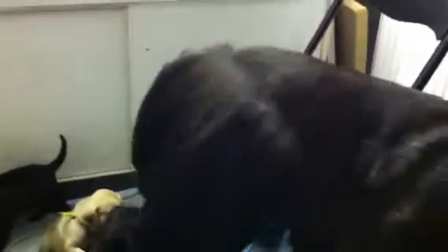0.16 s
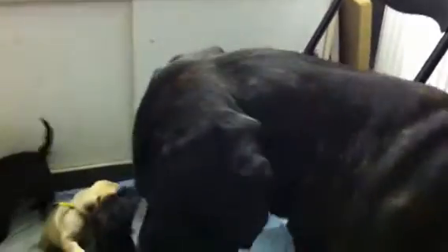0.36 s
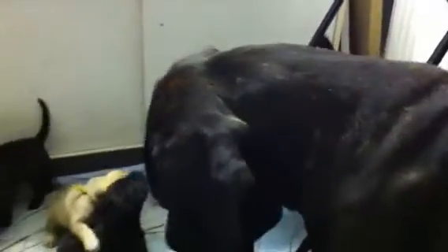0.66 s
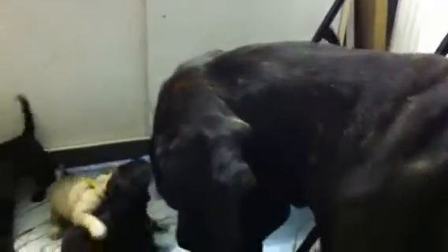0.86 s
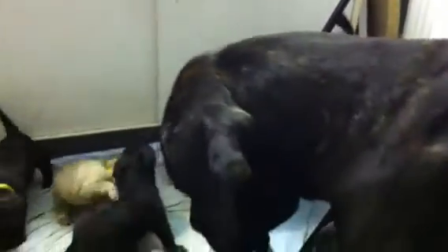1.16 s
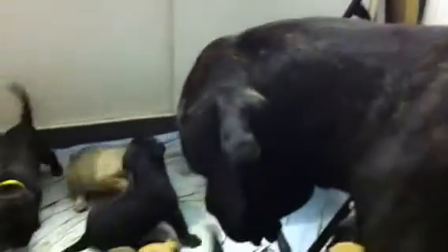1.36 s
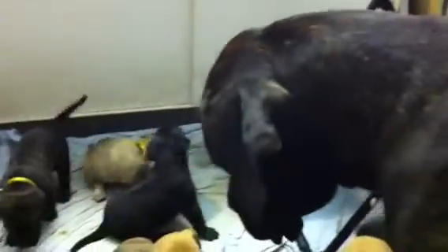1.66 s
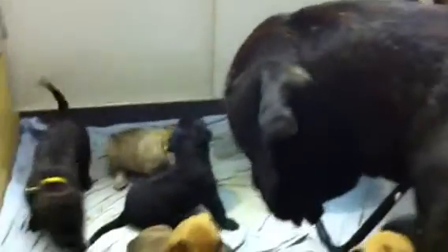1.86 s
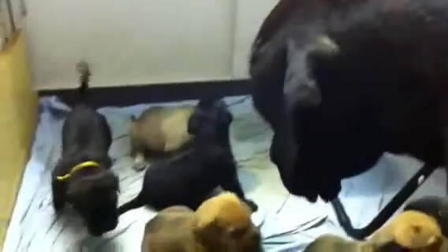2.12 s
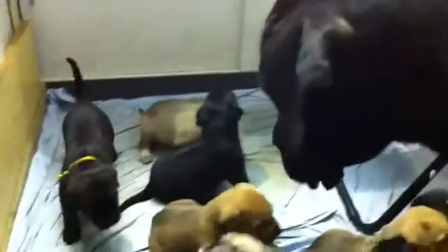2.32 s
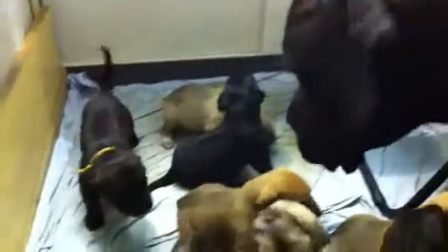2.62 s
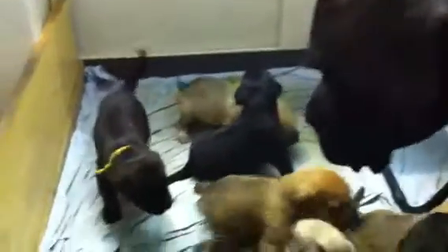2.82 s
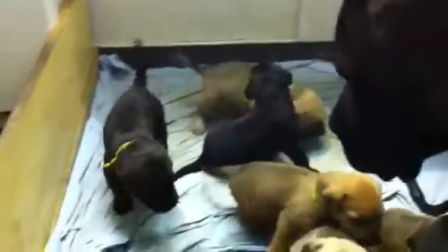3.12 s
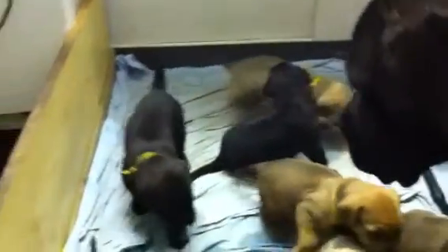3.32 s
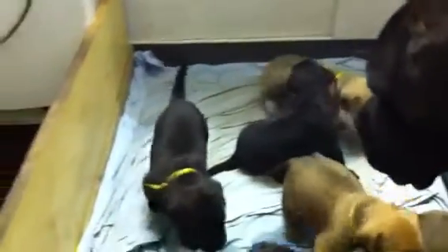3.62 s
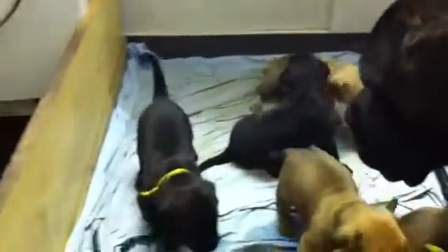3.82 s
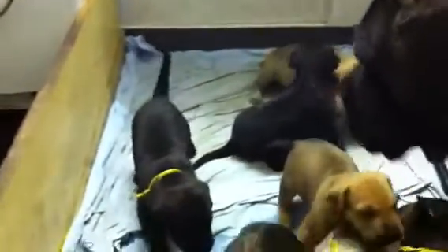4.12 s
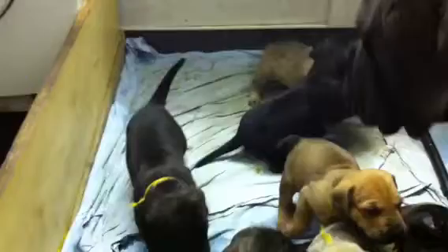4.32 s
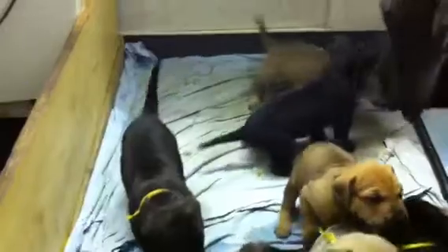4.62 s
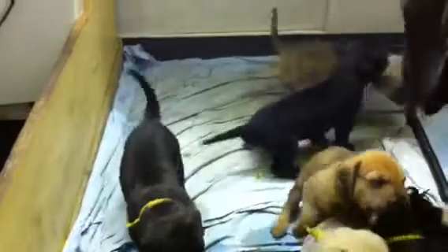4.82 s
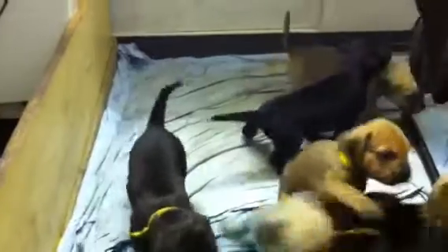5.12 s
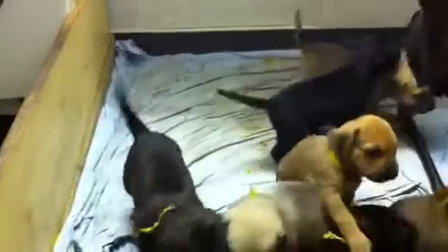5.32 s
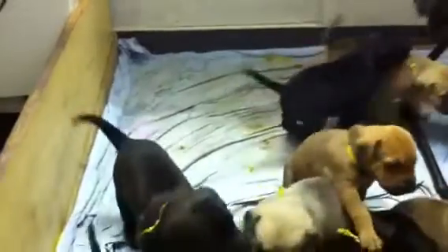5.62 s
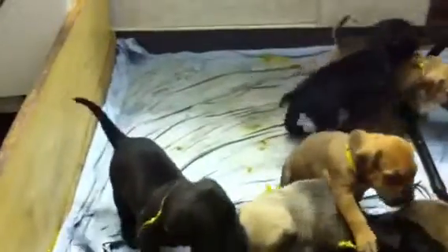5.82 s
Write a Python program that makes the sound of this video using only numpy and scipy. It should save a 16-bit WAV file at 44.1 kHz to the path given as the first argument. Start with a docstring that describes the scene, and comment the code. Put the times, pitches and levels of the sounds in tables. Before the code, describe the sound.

Five loud, breaking puppy yelps come between softer yips and grunts, with faint rustling of bedding over a low room rumble.

```python
"""Over a low room rumble a puppy whimpers, close to the microphone, in a whelping box in a small,
hard-walled room. After grunts and two yips come five loud yelps that arch up, break to a low
register and end in a rasp; softer whines and yips follow while paws shuffle on the bedding.
Each cry is vocal fold pulses and puffs of breath ringing the chest, throat and mouth.
Floor, box and walls send back quick echoes and a short ring."""
import sys
import numpy as np
from scipy import signal
from scipy.fft import rfft, irfft, next_fast_len
from scipy.io import wavfile
from scipy.ndimage import uniform_filter1d

SR = 44100
rng = np.random.default_rng(int(sys.argv[2]) if len(sys.argv) > 2 else 0)


def log_audio(samples):
    """Write samples as a 16-bit WAV file to the path given in sys.argv[1]."""
    # one column per channel
    frames = np.atleast_2d(samples).T
    # limit to full scale, then quantise
    limited = np.clip(frames, -1, 1)
    pcm = np.round(limited * 32767).astype(np.int16)
    wavfile.write(sys.argv[1], SR, pcm)


N = 263409
EDGE_HZ = 15750  # top of the overtones and of the microphone's band
CATCH_S = .016  # a cry starts hoarse, until the folds catch
# the chest's ring under a low or raspy voice: (frequency [Hz], gain [dB])
CHEST_RING = [(70, -48.5), (120, -28), (175, -11.5), (235, 2), (320, 0), (410, -12.5), (620, -34.5)]


def gain_of(db):
    """Decibels to amplitude."""
    return 10 ** (np.asarray(db) / 20)


def evened(x):
    """Scales to an rms of one."""
    return x / np.sqrt(np.mean(x ** 2) + 1e-20)


def steadied(x, size=500):
    """Scales to a running rms of one."""
    power = uniform_filter1d(uniform_filter1d(x ** 2, size), size)
    return x / np.sqrt(abs(power) + 1e-20)


def blend(a, b, share):
    """Goes from a to b as share goes from 0 to 1."""
    return a + (b - a) * share


def read(points, hz):
    """Reads a table on a logarithmic frequency axis."""
    f, value = np.transpose(points)
    return np.interp(np.log(hz + 1), np.log(f + 1), value)


def colour(x, points):
    """Filters by a table of (frequency [Hz], gain [dB])."""
    n = next_fast_len(len(x) + 2048)
    gain = gain_of(read(points, np.fft.rfftfreq(n, 1 / SR)))
    return irfft(rfft(x, n) * gain, n)[:len(x)]


def wander(n, rate_hz):
    """Smooth random drift of rms about one, rolled off above rate_hz."""
    size = next_fast_len(max(n, SR))
    hz = np.fft.rfftfreq(size, 1 / SR)
    spectrum = rfft(rng.standard_normal(size)) / (1 + (hz / rate_hz) ** 4)
    return evened(irfft(spectrum, size))[:n]


def resonate(x, hz, *widths_hz):
    """One resonance of gain one per width, in series, centred on a steady or gliding hz."""
    turn = np.exp(2j * np.pi * np.cumsum(np.broadcast_to(hz, len(x))) / SR)
    for width in widths_hz:
        pole = np.exp(-np.pi * width / SR)
        x = 2 * (turn * signal.lfilter([1 - pole], [1, -pole], x / turn + 1e-18)).real
    return x


def add(mix, s, sound):
    """Mixes a sound in at time s."""
    part = mix[round(s * SR):][:len(sound)]
    part += sound[:len(part)]


def room_tone(level_db=-64):
    """A low room rumble that wavers slightly, under thin steady hiss."""
    # the room's steady noise: (frequency [Hz], relative density [dB])
    spectrum = [(30, -37), (65, -28), (100, -18.5), (130, -8), (170, -2.5), (300, -3.5), (470, -5),
                (800, -10.5), (1300, -15), (2500, -20.5), (5000, -22.5), (9000, -24), (12000, -22),
                (15600, -25.5)]
    hiss = evened(colour(rng.standard_normal(N), spectrum))
    rumble = colour(hiss, [(600, 3.5), (1500, -17.5)])
    return gain_of(level_db) * (hiss + 0.14 * wander(N, rate_hz=3.2) * rumble)


def folds(hz, rough, jitter, rough_jitter, shimmer, alternation, spread_s):
    """Vocal fold pulses that grow uneven and give way to puffs of air as the voice roughens."""
    n = len(hz)
    unsteady_hz = hz * (1 + (jitter + rough_jitter * rough) * wander(n, rate_hz=125))
    turns = np.cumsum(unsteady_hz) / SR
    k = np.arange(1, int(EDGE_HZ / hz.min()) + 1)[:, None]
    # soft folds close gradually, so the overtones of each pulse arrive spread in time
    lag_s = spread_s * k * hz / EDGE_HZ
    overtones = np.cos(2 * np.pi * k * (turns - lag_s * hz)) * (k * hz < EDGE_HZ)
    pulses = evened(overtones.sum(0))
    # strong and weak pulses alternate in a strained voice
    pulses *= 1 + rough * (shimmer * wander(n, rate_hz=81) + alternation * np.cos(np.pi * turns))
    puffs = evened((0.55 + np.exp(-(turns % 1) / 0.2)) * rng.standard_normal(n))
    return blend(pulses, puffs, rough), puffs


def cry(t, hz, rough, throat_hz, mouth_db, throat_db, upper_db, low, jaw,
        mouth_shift, piercing_hz, piercing_db, top_db, air):
    """The folds drive the throat, chest, mouth and upper resonances; low is the low register's share."""
    # the mouth's resonance, and the upper ones with jaw wide or nearly shut: (frequency [Hz], gain [dB])
    mouth_ring = [(710, -46), (1030, -16.5), (1210, -7), (1470, 2), (1760, 2.5), (2010, -2.5), (2310, -9.5),
                  (2620, -27.5), (3150, -64.5)]
    upper_wide = [(2010, -46), (2560, -5.5), (2960, -3), (3340, -5), (3810, -3.5), (4460, 0.5),
                  (5010, -3.5), (5710, -5.5), (6310, -16), (8010, -19.5), (9610, -29), (12100, -29),
                  (14100, -45.5), (15400, -58.5)]
    upper_shut = [(2010, -11), (2660, -5), (3360, -10.5), (4110, -13), (4710, -10), (5610, -8),
                  (6710, -18.5), (8510, -9.5), (11100, -22), (15400, -42.5)]
    low_mouth_shift, gap_hz, brighten_s = 1.045, 2020, 0.044
    rough = np.clip(rough, 0, 1)
    drive, puffs = folds(hz, rough, jitter=.009, rough_jitter=.06, shimmer=0.74,
                         alternation=0.16, spread_s=0.0019)
    throat = resonate(drive, throat_hz, 870, 300)
    throat = colour(throat, [(70, -40), (140, -9), (240, 7.0), (1000, 5.0), (1400, -7)])
    # the lower and rougher the voice, the more chest
    throat += (0.72 + 0.65 * rough) * (340 / hz) ** 3 * colour(drive, CHEST_RING)
    mouth_high = colour(drive, np.array(mouth_ring) * [mouth_shift, 1])
    mouth_low = colour(drive, np.array(mouth_ring) * [mouth_shift * low_mouth_shift, 1])
    mouth = blend(mouth_high, mouth_low, low)
    # the cry starts through a narrow gap behind the tongue, which rings higher
    mouth += 4 * np.exp(-t / 0.0051) * resonate(drive, gap_hz, 380, 380)
    airy = drive + air * puffs
    upper = blend(colour(airy, upper_shut), colour(airy, upper_wide), jaw)
    upper = colour(upper, [(7000, 0), (12500, top_db)])  # more top with the muzzle towards the microphone
    upper += gain_of(piercing_db) * resonate(upper, piercing_hz, 750, 750)
    # the highest overtones build up only as the folds begin to slam shut
    dull = colour(upper, [(2800, -1), (4500, -11.5), (6500, -31.5)])
    upper = blend(upper, dull, np.exp(-(t / brighten_s) ** 2))
    voice = gain_of(mouth_db) * (steadied(mouth) + gain_of(upper_db) * steadied(upper))
    voice += gain_of(throat_db) * steadied(throat)
    return voice * np.clip(np.minimum(t / 0.0041, (t[-1] - t) / 0.0066), 0, 1)


def phases(t, break_s, flip_s):
    """Three shares from 0 to 1: the rise to the register break, the flip itself and the fall after it."""
    rise = np.clip(t / break_s, 0, 1)
    low = .5 + .5 * np.tanh((t - break_s) / flip_s)
    fall = np.interp(t, [break_s, t[-1]], [0, 1])
    return rise, low, fall


def yip(crest_s, break_s, length, start_hz, crest_hz, low_hz, crest_db, low_db,
        throat_hz, throat_db, upper_db, rough, jaw, *timbre):
    """A soft cry whose pitch arches, then drops as the folds flip to their low register."""
    attack_s, release_s, arch_s, sag = 0.035, 0.073, 0.031, 0.024
    t = np.arange(0, length, 1 / SR)
    _, low, fall = phases(t, break_s, flip_s=0.0027)
    arch = np.exp(-((t - crest_s) / arch_s) ** 2)
    hz = blend(blend(start_hz, crest_hz, arch), low_hz * (1 - sag * fall), low)
    edge_db = -14.5 * (1 - np.clip(np.minimum(t / attack_s, (length - t) / release_s), 0, 1))
    mouth_db = blend(crest_db, low_db, low) + edge_db - 5.5 * fall
    throat_db = throat_db + 0.62 * edge_db + 4 * low
    upper_db = upper_db + 0.55 * edge_db - 3 * fall
    rough = rough * (1 + 2.2 * np.exp(-(t / CATCH_S) ** 2)) + 0.095 * low
    return cry(t, hz, rough, throat_hz, mouth_db, throat_db, upper_db, low, jaw, *timbre, air=0.194)


def paws():
    """Paws and bodies push on the bedding with a dull thud and a grainy crinkle; claws tick on the box."""
    # rubs over the bedding: (start [s], length [s], thud level [dB], crinkle level [dB])
    shuffles = [(.86, 0.1, -68, -73), (4.618, 0.52, -68, -72), (5.258, 0.13, -75, -60),
                (5.417, 0.086, -69, -60), (5.843, 0.14, -69, -62.5)]
    # the bedding's thud and crinkle: (frequency [Hz], gain [dB])
    thud_spectrum = [(80, -13), (170, 2), (450, -2), (900, -4), (2000, -31), (5000, -34)]
    crinkle_spectrum = [(1000, -18), (2500, -1), (5000, -1.5), (8000, -7), (10000, -9), (12000, 4),
                        (14000, -4), (15500, -3)]
    # claws striking the box: (time [s], peak [dB], centre [Hz])
    claw_ticks = [(3.027, -50, 3004), (5.18, -47, 2580), (5.428, -47, 11030), (5.738, -47.5, 11990)]
    out = np.zeros(N)
    for s, length, thud_db, crinkle_db in shuffles:
        n = int(length * SR)
        thud = evened(colour(rng.standard_normal(n), thud_spectrum))
        grains = rng.standard_normal(n) * gain_of(2.9 * wander(n, rate_hz=140))
        crinkle = evened(colour(grains, crinkle_spectrum))
        shuffle = gain_of(thud_db) * thud + gain_of(crinkle_db) * crinkle
        add(out, s, shuffle * signal.windows.tukey(n, .5))
    t = np.arange(SR // 30) / SR
    for s, db, hz in claw_ticks:
        strike = rng.standard_normal(len(t)) * np.exp(-t / 0.0024)
        tick = resonate(strike, hz, 0.55 * hz)
        add(out, s, gain_of(db) * tick / abs(tick).max())
    return out


def grunt(length, mid_hz, throat_hz, throat_db, mouth_db, rough, sag=0.119):
    """One short low push behind a closed mouth, mostly throat and chest, whose pitch sags."""
    t = np.arange(0, length, 1 / SR)
    hz = mid_hz * (1 + sag * (.5 - t / length))
    edge_db = -22 * (1 - np.sin(np.pi * (t / length) ** 0.83))
    return cry(t, hz, rough, throat_hz, mouth_db + edge_db, throat_db + edge_db, upper_db=-23,
               low=0, jaw=0, mouth_shift=0.89, piercing_hz=5500, piercing_db=12, top_db=-2, air=.3)


def yelp(curve, break_s, clear_rough, end_rough, growl_db, upper_db, shut_hz, *timbre):
    """A squeal arches up, breaks to a rough low register, then sags into a growl as the jaw shuts."""
    slack_hz, jaw = 412, 0.96  # below slack_hz the folds go slack
    s, pitch, effort = np.transpose(curve)
    t = np.arange(0, s[-1] - s[0], 1 / SR)
    hz, effort_db = np.interp(s[0] + t, s, pitch), np.interp(s[0] + t, s, effort)
    rise, low, fall = phases(t, break_s - s[0], flip_s=.003)
    swell = 1 - (1 - rise) ** 2
    slack = low * (.5 + .5 * np.tanh((slack_hz - hz) / 15))
    # the throat swells, then holds; the upper resonances flare at the break, then dull
    throat_db = blend(blend(-65.5, -47, swell), blend(-41.5, -44.5, fall), low)
    flare_db = blend(-6.5 * (1 - rise) ** 3, blend(3.5, -7, fall ** 0.45), low)
    rough = blend(clear_rough, blend(.3, end_rough, slack), low)
    rough = blend(rough, .9, np.exp(-(t / CATCH_S) ** 2))
    throat_hz = blend(blend(700, 840, rise), shut_hz, fall)  # up as the jaw opens, down as it shuts
    voice = cry(t, hz, rough, throat_hz, effort_db, throat_db, upper_db + flare_db, low, jaw,
                *timbre, air=.3)
    return voice + gain_of(growl_db) * slack * signal.windows.tukey(len(t), .12) * growl(hz)


def growl(hz, thin_below_hz=230):
    """Slack folds rattle at half the pitch and shake the chest."""
    rattle, _ = folds(hz / 2, rough=.75, jitter=0.027, rough_jitter=.1, shimmer=0.86,
                      alternation=0.22, spread_s=0.0024)
    chest = colour(rattle, CHEST_RING)
    return evened(colour(chest, [(.7 * thin_below_hz, -10), (thin_below_hz, 0), (700, 6)]))


def puppies():
    """The litter in the box: five loud open-jawed yelps among softer yips and grunts."""
    # soft yips and whines: (start [s], time to crest [s], time to break [s], length [s],
    #   start pitch [Hz], crest pitch [Hz], low pitch [Hz], base crest level [dB], base low level [dB],
    #   throat [Hz], base throat level [dB], base upper gain [dB], base roughness [0-1], jaw [0-1],
    #   then the timbre: mouth shift [ratio], piercing resonance [Hz], its gain [dB], top gain [dB])
    yips = [ (0.683, 0.026, .048, 0.067, 478, 467, 356, -60.5, -70, 427, -51.5, -19, 0.05, .1, 0.92, 5500, 3, 0),
            (1.42, 0.063, 0.12, .19, 528.6, 572.4, 354.2, -44, -48, 730, -52.5, -4, 0.17, 0.54, 0.98, 3450, 7, 2),
            (1.798, 0.087, 0.12, 0.17, 406, 447.8, 391, -54, -51, 730, -53.5, -13, 0.38, 0.04, 1.02, 3380, 6, 11),
            (4.84, .062, 0.08, 0.14, 785, 960, 488.4, -49, -37.5, 833, -52.5, -15, 0.09, .1, 0.88, 5670, 3, 7),
            (5.245, 0.036, .056, 0.14, 785, 849, 745, -39, -35.5, 757, -50.5, -13.5, 0.22, 0.02, 0.94, 3540, 16.5, 9),
            (5.59, 0.06, .095, 0.16, 392.5, 394, 373, -46, -48, 740, -56.5, -16, 0.64, 0.17, 1.023, 3220, -11, -6),
            (5.924, 0.043, .075, .09, 450, 468, 460, -42, -41, 642, -58.5, -4, 0.52, 0.2, 1.03, 3380, 4, -14)]
    # grunts: (start [s], length [s], mid pitch [Hz], throat [Hz], throat level [dB],
    #   mouth level [dB], roughness [0-1])
    grunts = [(1.02, 0.05, 232, 240, -47, -65.5, 0.29), (1.24, 0.054, 254.6, 338, -58.5, -74, 0.34),
              (4.38, 0.0614, 237.3, 269, -44, -53, 0.38), (4.614, 0.067, 248.8, 358, -46, -53, 0.23)]
    # the course of each yelp: (time [s], pitch [Hz], effort [dB])
    yelp_1 = [(2.107, 603.5, -48.5), (2.14, 625.2, -27.5), (2.175, 763, -11.5), (2.212, 733, -16.5),
              (2.224, 533.2, -22.5), (2.294, 443, -27.5), (2.345, 384, -45.5), (2.396, 336, -40.5),
              (2.42, 299.8, -47.5)]
    yelp_2 = [(2.616, 429.3, -61.5), (2.632, 426.7, -36), (2.68, 513.5, -21.5), (2.718, 450.6, -28),
              (2.74, 439.7, -28.5), (2.757, 415.4, -43), (2.771, 384.4, -32), (2.793, 372.7, -53),
              (2.858, 285, -47.5)]
    yelp_3 = [(3.092, 562.8, -37.5), (3.117, 586.6, -28), (3.155, 795.7, -17), (3.167, 472.4, -19.5),
              (3.214, 444, -27.5), (3.262, 389.6, -39.5), (3.32, 383.3, -60), (3.362, 396.7, -47.5),
              (3.379, 415, -57)]
    yelp_4 = [(3.584, 671.5, -47), (3.619, 598.2, -29), (3.65, 749.5, -22), (3.671, 734.3, -24.5),
              (3.684, 538.7, -27.5), (3.71, 491.8, -24.5), (3.751, 408.8, -29.5), (3.789, 396.3, -37.5),
              (3.828, 383.6, -57)]
    yelp_5 = [(4.025, 604, -41), (4.042, 579.4, -40.5), (4.064, 564.8, -29), (4.092, 580.6, -29.5),
              (4.108, 534, -26), (4.137, 408.1, -28), (4.16, 344.5, -30.5), (4.188, 327.7, -54),
              (4.212, 323, -55)]
    # the voice of each yelp: (register break [s], clear roughness [0-1], end roughness [0-1],
    #   growl level [dB], base upper gain [dB], shut throat [Hz], then the timbre as for the yips)
    yelp_voices = [(2.218, 0.03, .8, -54, -7.5, 700, 0.93, 4270, -14.5, -7),
                   (2.712, .09, 0.81, -48, -4.5, 692, 1.04, 4460, -4, 3),
                   (3.16, 0.24, .07, -67, -3.5, 767, 1.051, 5350, -14.5, 1.5),
                   (3.679, .11, 0.1, -80, -4.5, 740, 1, 4190, 0.5, 10.5),
                   (4.115, 0.13, 0.51, -51.5, -4, 360, 0.98, 3920, 3.5, 1.5)]
    out = np.zeros(N)
    for curve, row in zip((yelp_1, yelp_2, yelp_3, yelp_4, yelp_5), yelp_voices):
        add(out, curve[0][0], yelp(curve, *row))
    for voice, table in ((yip, yips), (grunt, grunts)):
        for s, *row in table:
            add(out, s, voice(*row))
    return out


def room(x, wet_db, first_s):
    """Hard walls close by: a few echoes, then dense reflections, each band dying at its own speed."""
    # the room's ring: (frequency [Hz], time to fall 60 dB [s])
    ring_times = [(210, 0.079), (710, 0.34), (1750, 0.33), (4600, 0.31), (8100, 0.4), (14100, 0.22)]
    # first echoes from the floor, box and wall: (delay [s], level [dB])
    echoes = [(.0023, -19.5), (.0061, -16), (.0097, -9.5), (0.0144, -13.5)]
    count, spacing = 1500, 20  # one reflection of random sign in each 20 samples
    arrivals = int(first_s * SR) + spacing * np.arange(count) + rng.integers(0, spacing, count)
    taps = np.zeros(SR)
    taps[arrivals] = rng.choice([-1., 1.], count)
    hz, t, bands = signal.stft(taps, SR, nperseg=256)
    decay = gain_of(-60 * t / read(ring_times, hz)[:, None])
    _, tail = signal.istft(bands * decay, SR, nperseg=256)
    response = gain_of(wet_db) * tail / np.linalg.norm(tail)
    for s, db in echoes:
        response[round(abs(s) * SR)] += gain_of(db)
    return x + signal.fftconvolve(x, response)[:N]


def scene():
    """Cries and paws as they reach one microphone near the box, over the room tone."""
    return (room(puppies() + paws(), wet_db=-4.5, first_s=.0035) + room_tone())[None]


def record(dry):
    """The microphone and recorder pass nothing much above EDGE_HZ."""
    lowpass = signal.firwin(511, EDGE_HZ, window=("kaiser", 9), fs=SR)
    return signal.oaconvolve(dry, lowpass[None], "same")


dry = scene()
out = record(dry)
log_audio(out)
```